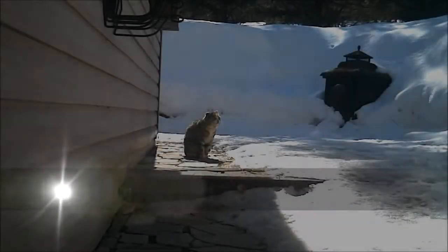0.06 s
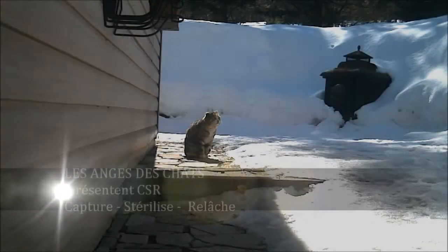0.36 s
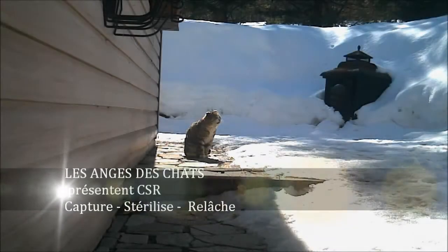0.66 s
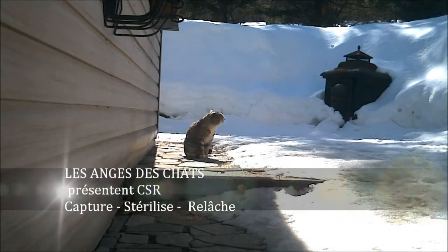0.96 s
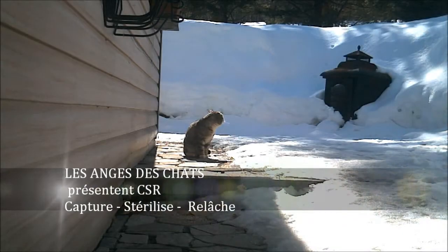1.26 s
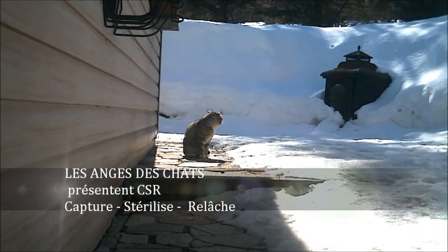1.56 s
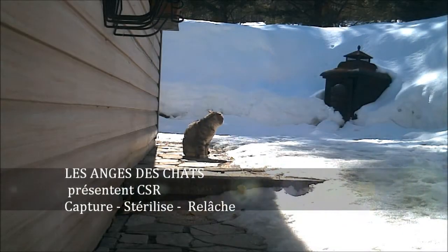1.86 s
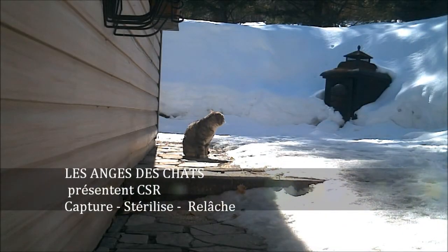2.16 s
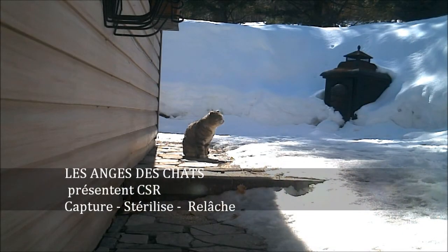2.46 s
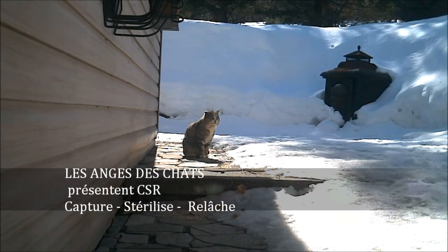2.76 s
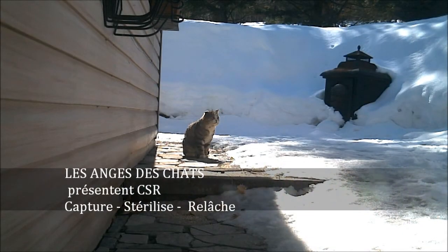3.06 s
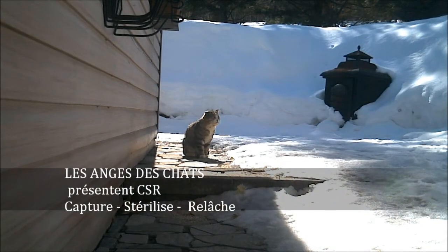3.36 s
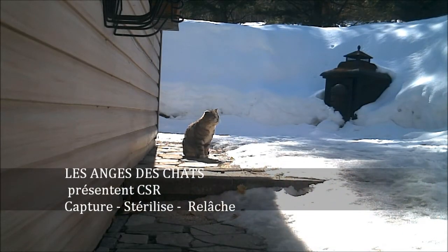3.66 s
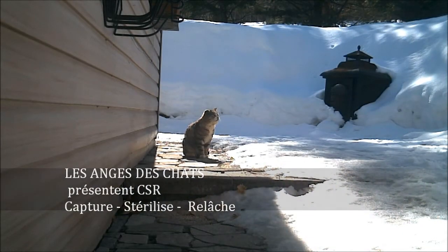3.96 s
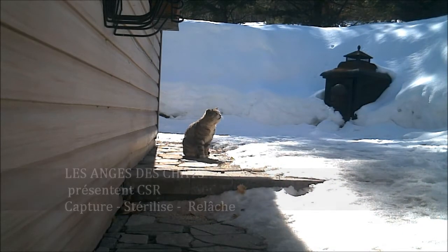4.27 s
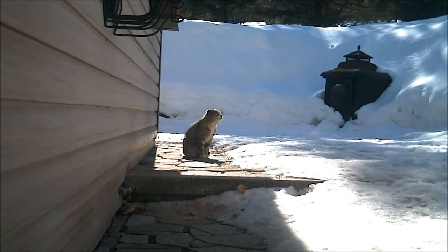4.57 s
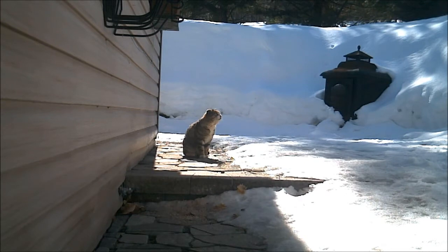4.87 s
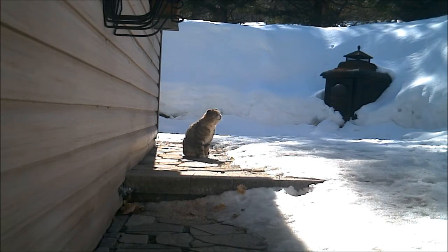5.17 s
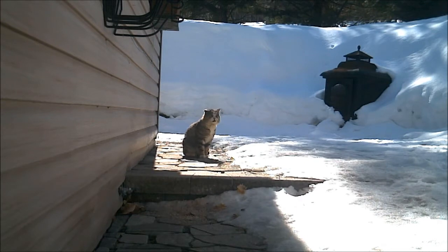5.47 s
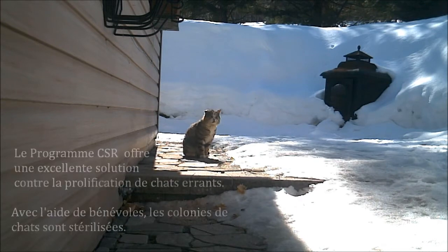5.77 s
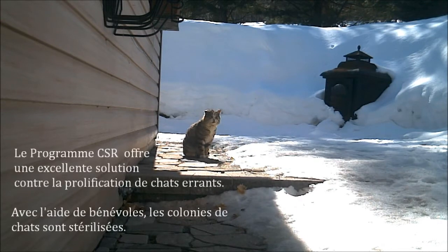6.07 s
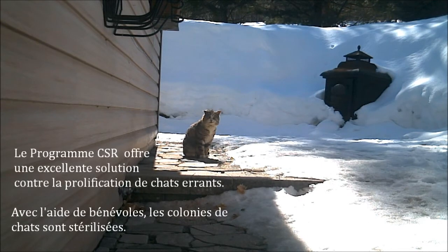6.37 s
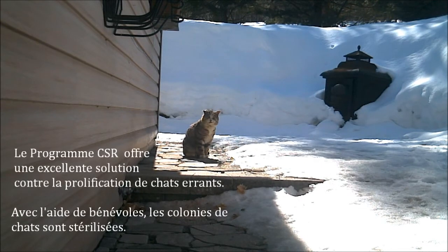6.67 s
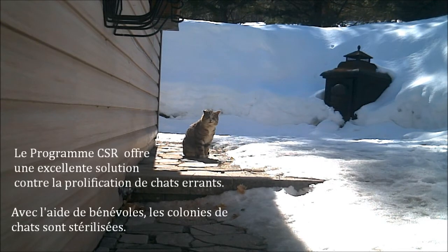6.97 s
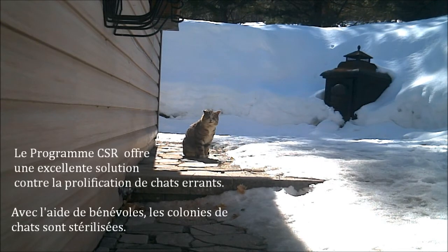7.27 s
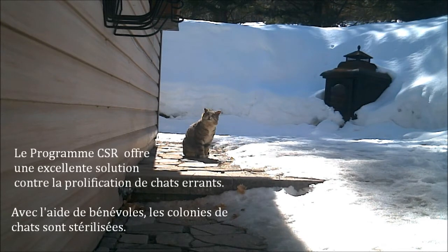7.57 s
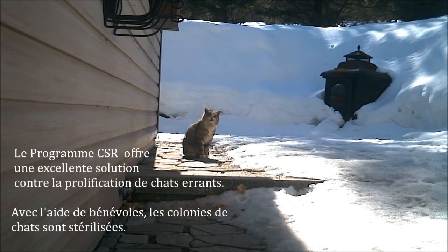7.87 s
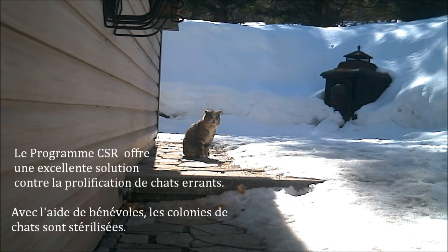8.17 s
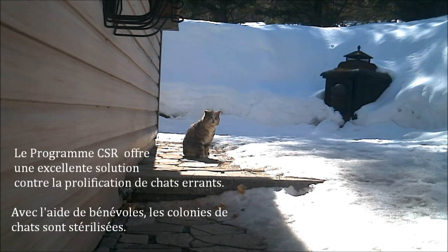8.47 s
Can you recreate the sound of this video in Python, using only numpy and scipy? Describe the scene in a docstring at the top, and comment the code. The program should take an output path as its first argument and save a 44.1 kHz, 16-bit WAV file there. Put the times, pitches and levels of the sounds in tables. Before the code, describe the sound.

A cat meows outdoors by a house wall, over a steady low rumble and light hiss. The faint end of one call opens the sound, and two sharp electrical clicks come at about 0.2 and 0.4 seconds. Five whole meows follow, at about 0.7, 1.6, 4.1, 5.5 and 7.8 seconds, each lasting around half a second. The one at 4.1 seconds is the strongest. The calls tend to start raspy, clear into a tone and lift in pitch as they close; the last stays rougher. Nearby surfaces add a short, thin echo, and the cheap microphone hisses a little along with each call. Faint small drips are scattered throughout, for instance near 1.4, 6.2 and 7.9 seconds. Soft, low puffs of wind touch the microphone between about 2.4 and 3.7 seconds and again around 6.5 seconds.

```python
"""A cat meows: the end of one call, then five whole ones, by a house wall in a snowy yard.
Its vocal folds buzz and its mouth shapes the tone: a call starts raspy, clears, and lifts in pitch
as the mouth shuts. Nearby surfaces throw the sound back. Behind it are small drips, puffs of wind
and a low rumble. The cheap recorder hisses along with loud sounds and clicks twice."""
import sys
import numpy as np
from scipy import signal
from scipy.fft import rfft, irfft, next_fast_len
from scipy.io import wavfile
from scipy.ndimage import uniform_filter1d, minimum_filter1d

SR = 44100
rng = np.random.default_rng(int(sys.argv[2]) if len(sys.argv) > 2 else 0)


def generate_wav(sig):
    """Save sig (samples, or channels by samples) to the path in sys.argv[1] as 16-bit PCM at SR."""
    pcm = np.round(np.clip(np.atleast_2d(sig).T, -1, 1) * 32767).astype(np.int16)
    wavfile.write(sys.argv[1], SR, pcm)


N = 375291
TIME = np.arange(N) / SR


def cat():
    """The cat calls six times, each time moving its voice and mouth in a different way."""
    # one row a call: start/s, rise time/s, fade from/s, end/s, level/dB, f/Hz the throat's ring sinks to,
    # then boost/dB for harmonics 2, 3, 4 and for the ring
    calls = [ (0, 0.015, 0.071, 0.18, -5, 3700, -17, -26, -20, -14),
             (.678, 0.05, 0.95, 1.035, 0.5, 3600, 0, -2, 0.5, -2.5),
             (1.608, 0.1, 1.94, 2.084, -3.5, 4550, -4, -7.5, 2.5, -4.5),
             (4.086, 0.087, 4.375, 4.66, 4, 3600, 1, -1, -1.5, -4.5),
             (5.445, 0.1, 5.741, 5.917, -1.86, 3460, 0, -8, -10.5, -6.5),
             (7.753, 0.074, 8.2, 8.3, -4.5, 4100, -1, 1.5, 3, 0.5), ]
    # one list a call: t/s, pitch/Hz, mouth opening (0 shut, 1 wide), roughness (0 clear, 1 raspy)
    gestures = [
        [(0, 549, 0, 0.1), (.1, 532, 0.15, .1), (.21, 620, 0.1, .1)],
        [(0.691, 477, 0.0, 0.48), (0.712, 471, 0.94, 0.26), (0.756, 459.1, 0.93, 0.38),
         (0.807, 466.9, 0.96, 0.2), (0.847, 475.6, 0.91, 0.2), (0.886, 483.6, 0.65, 0.0),
         (0.929, 474.5, 0.6, 0.02), (0.958, 485.6, 0.4, 0.42), (1.042, 480.5, 0.5, 0.17)],
        [(1.629, 412.3, 0.1, 0.96), (1.69, 441.3, 0, 0.62), (1.767, 465, 0, 0.3), (1.82, 475.6, 0.97, 0.3),
         (1.862, 488.4, 0.7, 0.0), (1.888, 496, 0.63, 0.0), (1.922, 506, 0.11, 0.2), (1.973, 499.3, 0.7, 0.37),
         (2.042, 541, 0, 0.6)],
        [(4.115, 432, 0.13, 0.66), (4.133, 474.5, 1, 0.54), (4.192, 486.3, 0.91, 0.23),
         (4.282, 471.7, 0.91, 0.2), (4.342, 455.9, 0.61, 0.13), (4.387, 490.5, 0.51, 0.05),
         (4.412, 512.0, 0.41, 0.05), (4.52, 522.5, 0.6, 0.12), (4.612, 598, 0.15, 0.4)],
        [(5.462, 430.4, 0, 1.1), (5.524, 472, 0.2, 0.74), (5.549, 455.3, 0.95, 0.77), (5.602, 450.3, 0.8, 0.54),
         (5.636, 444.4, 0.88, 0.7), (5.68, 465.6, 0.7, 0.23), (5.731, 491.4, 0.48, 0.3), (5.798, 559.5, 0, 0),
         (5.899, 572, 0.25, 0.3)],
        [(7.772, 433.2, 0.05, 1.0), (7.845, 497, 0.03, 0.3), (7.92, 490.5, 0.73, 0.47), (7.98, 491, 0.74, 0.45),
         (8.016, 485.6, 0.93, 0.74), (8.081, 477, 0.48, 0.42), (8.149, 464.3, 0.48, 0.05),
         (8.209, 493, 0.54, 0.3), (8.284, 504, 0.2, 0.8)],
    ]
    out = np.zeros(N)
    for call, gesture in zip(calls, gestures):
        add(out, call[0], meow(call, gesture))
    return out


def meow(call, gesture, jitter=.042, shimmer_db=3.24, ring_db=-2, rasp_db=-23):
    """Vocal folds make harmonics (multiples of the pitch); when rough, they flap unevenly and leak air."""
    # a throat resonance lifts the harmonics that pass through it: f/Hz, boost/dB
    throat = [(1470, 0), (1560, 17), (1950, 17), (2000, 13), (2070, -6)]
    start, rise, _, end, _, ring_end_hz, *_ = call
    t = np.arange(round(start * SR), round(end * SR)) / SR
    hz, mouth, rough = curves(gesture, t)
    rough = np.clip(rough, 0, 1)
    *gains, ring_gain = mouth_gains(t, call, mouth)
    gains = [gain * amp(curves(throat, k * hz)[0]) for k, gain in enumerate(gains, 1)]
    wobble = jitter * rough * band(len(t), 45.2, 32) + .003 * band(len(t), 0, 60)
    # cycle goes round a circle once per flap of the folds, so cycle ** k is harmonic k
    cycle = np.exp(2j * np.pi * np.cumsum(hz * (1 + wobble)) / SR)
    beat = growl(t)
    low = 0
    for k, gain in enumerate(gains, 1):
        shimmer = amp(shimmer_db * band(len(t), 0, 15))
        low += gain * shimmer * cycle ** k * beat ** ((k + 1) // 2)  # a growl splits 3 and 4 twice
    high = amp(ring_db) * ring_gain * beat * throat_ring(t - start - rise, hz, cycle, rough, ring_end_hz)
    air = band(len(t), 1400, 340) * (1 + cycle.real) * rough * sum(gains)  # one puff per flap
    voice = np.sqrt(2) * (low + high).imag + amp(rasp_db) * air
    return voice * signal.windows.tukey(len(t), .09)


def mouth_gains(t, call, mouth, onset_db=-19, fade_db=-33.5, ring_fade_share=.4):
    """Effort and mouth opening set the strength of harmonics 1 to 4 and of the throat's ring."""
    # rows are harmonics 1 to 4, then the ring: level/dB with the mouth shut, half open, wide open
    vowel = [(-27.5, -30, -30), (-38, -20.5, -27), (-56.5, -55, -28), (-81, -65.5, -58), (-60, -51.5, -47)]
    start, rise, fade_from, end, level_db, _, *boosts_db = call
    effort_db = level_db + np.interp(t, [start, start + rise, fade_from, end], [onset_db, 0, 0, fade_db])
    late_db = np.interp(t, [start, start + rise], [-6, 0])  # higher rows start softer, then catch up
    second_db, upper_db = voice_breaks(t)
    extra_db = [0]
    for step, db in enumerate(boosts_db, 1):
        extra_db.append(db + (second_db if step == 1 else upper_db) + step * late_db)
    # the ring follows only a share of the closing fade
    extra_db[-1] -= (1 - ring_fade_share) * np.interp(t, [fade_from, end], [0, fade_db])
    mouth_db = [np.interp(mouth, [0, .5, 1], levels) for levels in vowel]
    return [amp(effort_db + db + extra) for db, extra in zip(mouth_db, extra_db)]


def throat_ring(since_peak, hz, cycle, rough, end_hz, start_hz=4225, sink_s=.051, width_hz=190):
    """A high resonance picks out the harmonics near it, and sinks once the call is at full strength."""
    ring_hz = end_hz + (start_hz - end_hz) * np.exp(-np.maximum(since_peak, 0) / sink_s)
    harmonics = sum(cycle ** k / (1 + ((k * hz - ring_hz) / width_hz) ** 2) for k in range(5, 12))
    blur = 1 + (.092 + rough) * band(len(hz), 0, 250)
    return harmonics * blur


def growl(t, wander=.16):
    """The folds also beat at a second, slower rate, which gives each harmonic a partner beside it."""
    # start/s, end/s, beat rate/Hz, depth (0 to 1)
    growls = [(.95, 1.007, 53.8, 0.1), (1.624, 1.74, 59.3, 0.9), (1.95, 2.014, 50, 0.15),
              (4.076, 4.193, 60, 0.1), (4.155, 4.294, 240.4, 0.01), (4.397, 4.467, 60, 0.17),
              (5.45, 5.65, 57.7, 0.23), (7.76, 8.08, 85.5, 0.55), (8.165, 8.21, 53.7, 0.2)]
    beat = np.ones(len(t), complex)
    for start, end, hz, depth in growls:
        progress = np.clip((t - start) / (end - start), 0, 1)
        strength = depth * np.sqrt(abs(np.sin(np.pi * progress)))
        sway = np.sin(2 * np.pi * (9 * t + rng.random()))
        turns = np.cumsum(hz * (1 + wander * sway)) / SR
        beat = (beat + strength * np.exp(-2j * np.pi * turns)) / np.hypot(1, strength)
    return beat


def voice_breaks(t):
    """The upper harmonics surge or drop for a moment as the voice breaks."""
    # t/s, length/s, change/dB of harmonic 2, change/dB of everything above it
    breaks = [(0.71, 0.024, -5, -3.5), (0.758, .04, 3, 5), (0.82, 0.03, -10, -2.5), (0.969, 0.019, 6.5, -8),
              (1.799, 0.023, -12, 7.5), (4.125, 0.033, -10, 0), (4.191, 0.017, 4, 6),
              (4.392, 0.023, 10, -9), (4.457, .03, -5, 3.5), (5.537, 0.023, -7, 2), (5.583, .05, 1.5, 5.5),
              (5.637, 0.028, -7, -3), (7.967, 0.064, -2, -10), (8.042, 0.049, 6, 6.5),
              (8.109, 0.028, -11, 2), (8.197, .03, 4, 3)]
    s, length, second_db, upper_db = np.transpose(breaks)
    bumps = np.exp(-(2 * (t[:, None] - s) / length) ** 2)
    return bumps @ second_db, bumps @ upper_db


def echoes(voice):
    """Near surfaces throw the voice back, so each harmonic swells and dips as the pitch glides."""
    # one entry an echo: delay/s
    delays = (.01096, .01418, .02287, .02761, .04443)
    # the same echoes: level/dB
    levels = (-17, -9.5, -7.5, -18.5, -15)
    out = np.zeros(N)
    for delay, db in zip(delays, levels):
        add(out, delay, amp(db) * voice)
    return out


def walls(voice, level_db=-22, die_away_s=.3):
    """The house and the snow banks add a thin wash of reflections that dies quickly."""
    t = TIME[:SR // 2]
    tail = noise(len(t), lambda f: 1 / (1 + (f / 3000) ** 2))
    tail *= amp(-60 * t / die_away_s) * (t > .008)
    tail /= np.sqrt(np.mean(abs(rfft(tail, SR)[400:2000]) ** 2))  # average gain 1 from 400 to 2000 Hz
    return amp(level_db) * signal.fftconvolve(voice, tail)[:N]


def drips(rise_s=.00015):
    """Each small drip is a brief splash of noise around one frequency."""
    # t/s, level/dB, centre f/Hz, width/octaves, time to fade by 60 dB/s
    drops = [(.2135, -36.5, 6470, 0.13, 0.015), (.6, -45, 5500, 0.63, 0.07),
             (1.425, -47.5, 5200, .6, 0.072), (1.42, -39.5, 930, 0.27, 0.15),
             (1.525, -46, 6450, .15, 0.035), (2.92, -50, 4970, 0.17, .08), (3.81, -49, 5500, .6, 0.071),
             (6.115, -45, 590, 0.61, 0.12), (6.195, -40.5, 580, 0.38, 0.11), (6.195, -45, 2780, 0.55, .04),
             (6.33, -48.5, 5300, .1, 0.054), (7.245, -46, 6000, 0.41, 0.036), (7.91, -38, 5200, 1, 0.18)]
    out, t = np.zeros(N), TIME[:SR // 5]
    for s, db, hz, octaves, die_away_s in drops:
        splash = noise(len(t), lambda f: np.exp(-.5 * (np.log2(f / hz) / octaves) ** 2))
        add(out, s, splash * amp(db - 60 * t / die_away_s) * (1 - np.exp(-t / rise_s)))
    return out


def wind(trim_db=-5.5):
    """Soft, low puffs of air push on the microphone."""
    # middle t/s, level/dB before the trim, centre f/Hz, length/s
    puffs = [(2.455, -35, 47.7, .12), (2.572, -33.5, 42, 0.11), (2.676, -33, 67, 0.12),
             (3.025, -32.5, 75.5, .11), (3.551, -35, 27, 0.13), (3.613, -39, 74.4, 0.108),
             (6.487, -39, 65, .14), (6.668, -36, 48.4, .13)]
    out = np.zeros(N)
    for s, db, hz, length in puffs:
        size = int(length * SR)
        puff = unit(band(size, hz, 14) * np.hanning(size))
        add(out, s - length / 2, amp(db + trim_db) * puff)
    return out


def yard(level_db=-43, hum_hz=164.5, hum_db=-61.5):
    """A distant rumble swells a little, over an even hiss and a faint, wavering hum."""
    # the background's tone colour: f/Hz, relative level/dB
    spectrum = [(15, -1), (35, -2.5), (50, -3), (80, -1), (112, -12.5), (195, -18.5), (380, -16),
                (490, -14), (590, -19), (950, -17), (1400, -24), (2400, -28), (3400, -30.5), (7100, -33),
                (7800, -36.5)]
    # the slow rise and fall of rumble and hum: t/s, change/dB
    drift = [(0, -1), (1, 1), (2.3, 0.5), (3.5, 2), (4.6, -1.5), (5.6, -0.5), (6.4, -.5), (7.3, -1.5),
             (8.5, 2)]
    hz, db = np.transpose(spectrum)
    wash = noise(N, lambda f: amp(np.interp(np.log(f), np.log(hz), db)) * (f > 10))
    rumble = signal.sosfiltfilt(signal.butter(2, 350, fs=SR, output="sos"), wash)
    hiss = wash - rumble
    swell = amp(curves(drift, TIME)[0] + band(N, 0, 2.8))
    hum = amp(hum_db) * swell * band(N, hum_hz, 3)
    return amp(level_db) * (hiss + swell * rumble) + hum


def amp(db):
    """Turns decibels into a number to multiply by."""
    return 10 ** (np.asarray(db) / 20)


def unit(x):
    """Scales a sound to an average strength (rms) of 1."""
    return x / np.sqrt(np.mean(x ** 2) + 1e-20)


def add(mix, s, sound):
    """Lays a sound into the mix at s seconds."""
    part = mix[max(round(s * SR), 0):][:len(sound)]
    part += sound[:len(part)]


def curves(rows, at):
    """Joins a table's rows with straight lines and reads them where the first column equals `at`."""
    axis, *columns = np.transpose(rows)
    return [np.interp(at, axis, column) for column in columns]


def noise(size, shape):
    """Noise of strength about 1, with each frequency weighted by shape(Hz)."""
    full = next_fast_len(max(size, SR // 2))
    hz = np.fft.rfftfreq(full, 1 / SR) + 1e-3
    return unit(irfft(rfft(rng.standard_normal(full)) * shape(hz), full))[:size]


def band(size, hz, width_hz):
    """Noise gathered around hz; around 0 Hz it is a random wobble."""
    return noise(size, lambda f: np.exp(-.5 * ((f - hz) / width_hz) ** 2))


def low_pass(x, hz):
    """Cuts away the sound above hz."""
    return signal.oaconvolve(x, signal.firwin(255, hz, window=("kaiser", 8), fs=SR), "same")


def limit(x, ceiling=.53):
    """Eases the volume down around any peak that would pass the ceiling."""
    gain = minimum_filter1d(np.minimum(1, ceiling / (abs(x) + 1e-9)), size=300)
    return x * uniform_filter1d(gain, size=300)


def scene():
    """The cat, its reflections, the drips, the wind and the yard, in one channel."""
    voice = cat()
    return (voice + echoes(voice) + walls(voice) + drips() + wind() + yard())[None]


def record(dry, hiss_db=-6.5, treble_limit_hz=7800, zero_offset=-.4246):
    """A cheap recorder hisses more as the wave gets steeper, cuts treble, clicks and sits off zero."""
    # the recorder's digital clicks: t/s, relative level/dB
    clicks = [(0.1623, -2.5), (.38327, -3)]
    x = dry[0]
    slope = np.gradient(low_pass(x, 2200))
    steepness = np.sqrt(abs(uniform_filter1d(slope ** 2, size=200)))
    hiss = amp(hiss_db) * steepness * rng.standard_normal(N)
    out = limit(low_pass(x + hiss, treble_limit_hz))
    for s, db in clicks:
        add(out, s, amp(db) * np.array([.12, .85, .12]))
    return low_pass(out, hz=15600)[None] + zero_offset


dry = scene()
out = record(dry)
generate_wav(out)
```